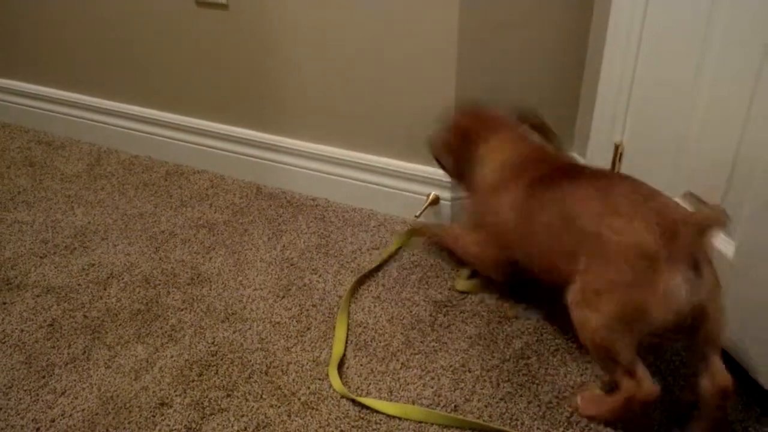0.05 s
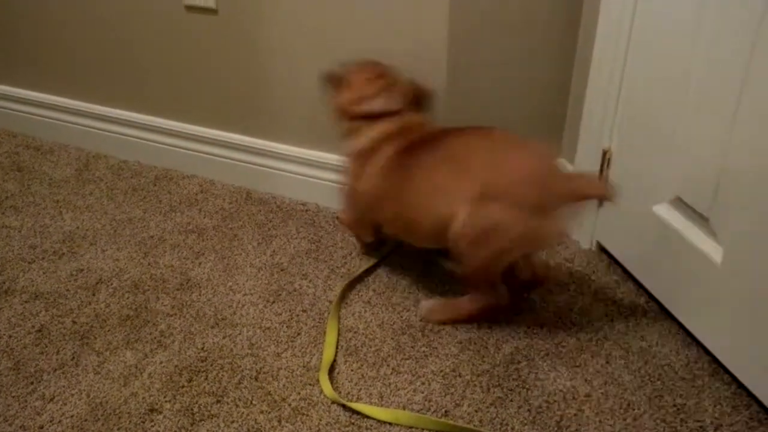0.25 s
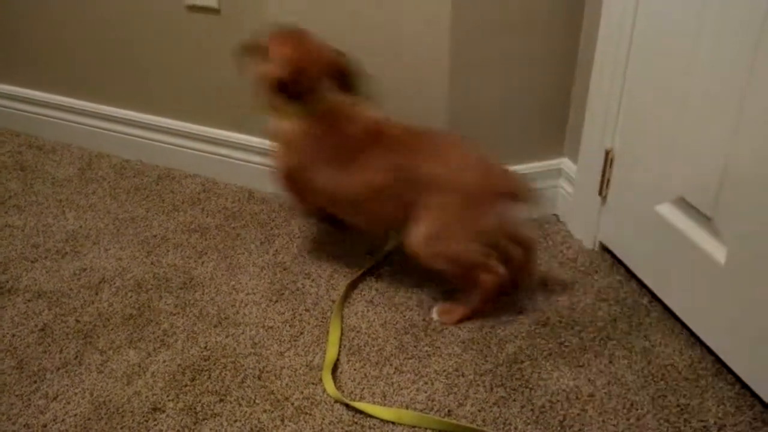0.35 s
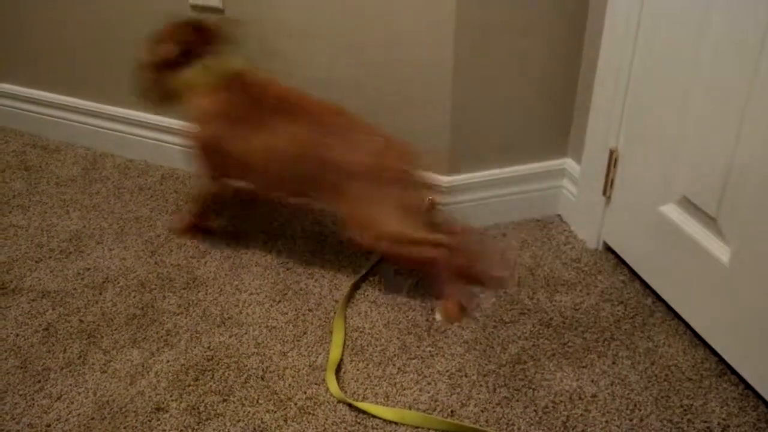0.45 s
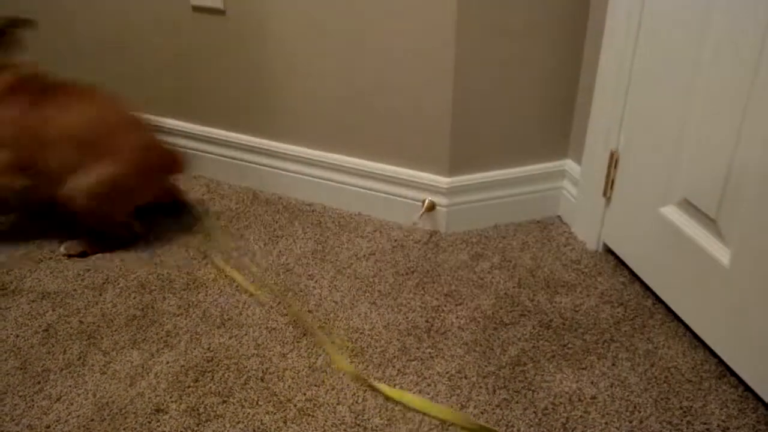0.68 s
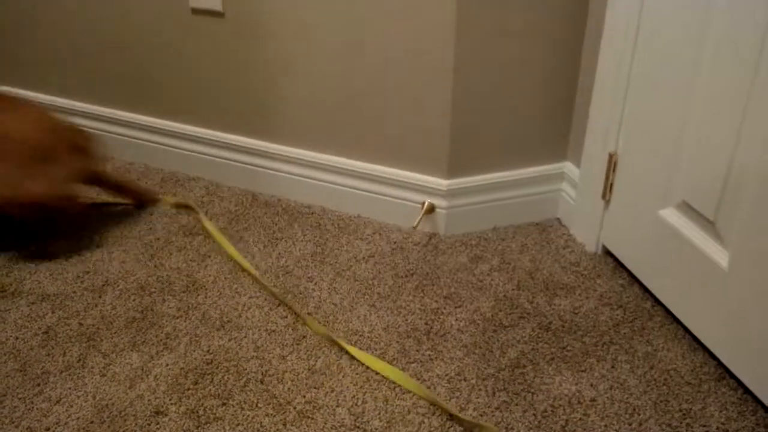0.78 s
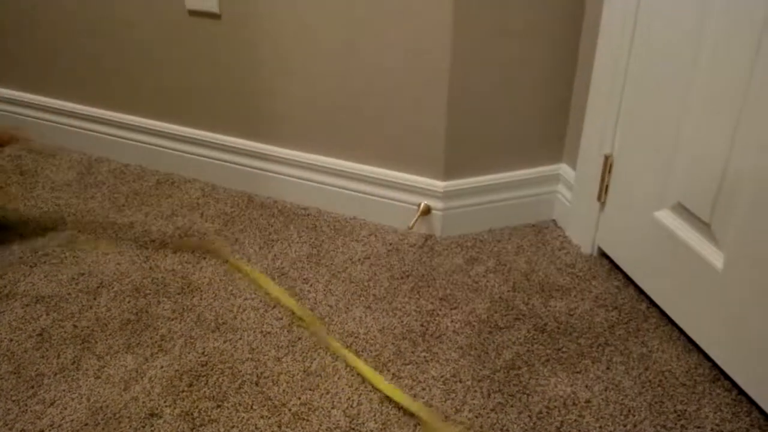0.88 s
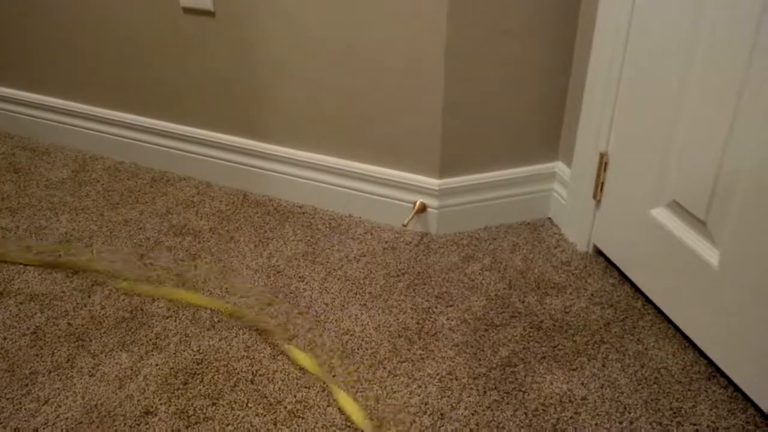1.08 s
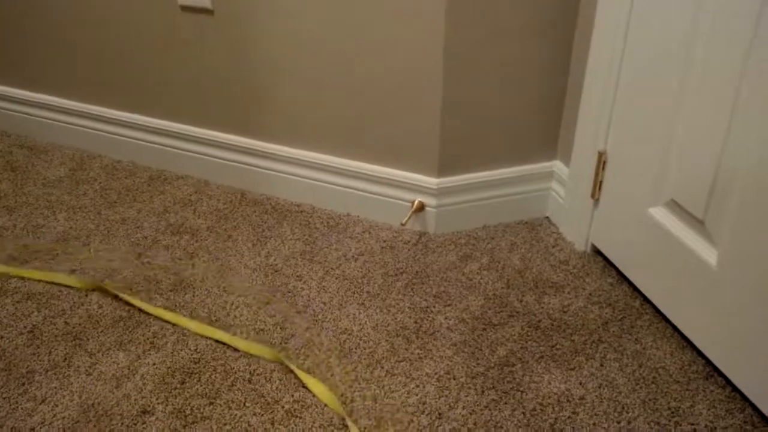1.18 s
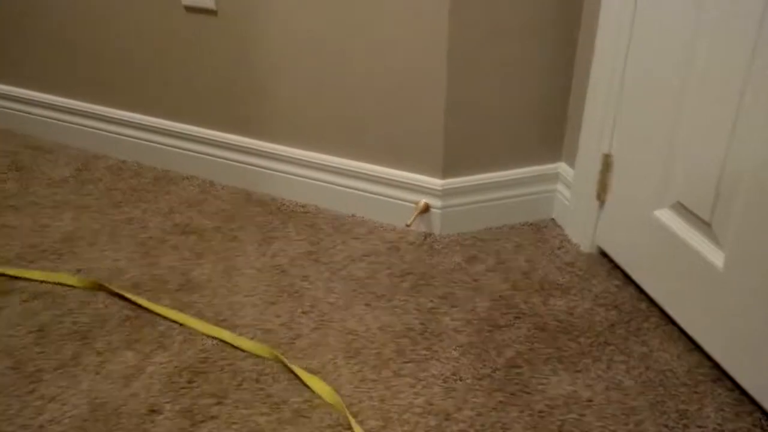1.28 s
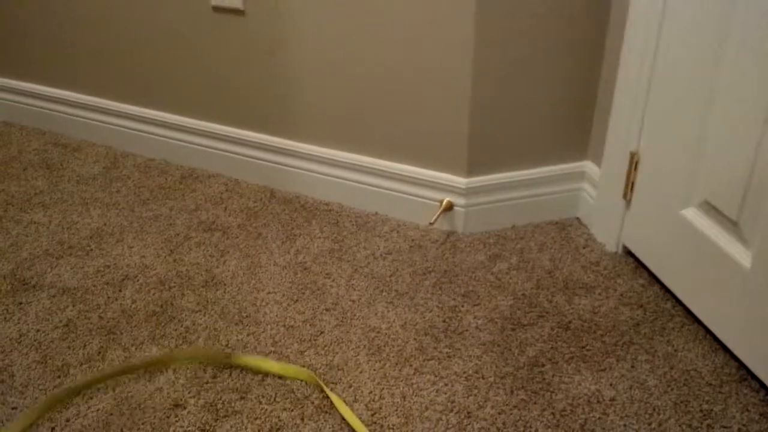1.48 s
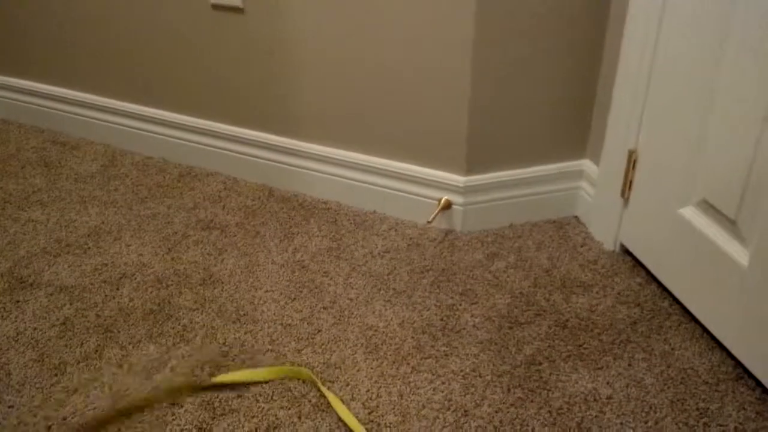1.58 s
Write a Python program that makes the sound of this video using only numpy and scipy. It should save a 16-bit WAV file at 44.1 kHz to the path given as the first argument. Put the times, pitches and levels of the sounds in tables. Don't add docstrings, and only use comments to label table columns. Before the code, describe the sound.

Flicked metal door stop spring buzzes loudly and dies within a second, with paw scuffs on carpet

```python
import sys
import numpy as np
from scipy import signal
from scipy.fft import rfft, irfft, next_fast_len
from scipy.io import wavfile
from scipy.ndimage import uniform_filter1d, map_coordinates

SR = 44100
rng = np.random.default_rng(int(sys.argv[2]) if len(sys.argv) > 2 else 0)


def wrap_up_sound(samples):
    columns = np.atleast_2d(samples).T
    tamed = np.clip(columns, -1, 1)
    steps = np.round(tamed * 32767).astype(np.int16)
    wavfile.write(sys.argv[1], SR, steps)


def invert_db(level):
    return 10 ** (np.asarray(level, dtype=float) / 20)


N = 72765
TIME = np.arange(N) / SR
DECAY_TIME = np.arange(SR // 3) / SR


def unit(x):
    return x / np.sqrt(np.mean(x ** 2) + 1e-20)


def along(points, hz):
    f, v = np.transpose(points)
    return np.interp(np.log(hz + 1), np.log(f + 1), v)


def curve(rows, order=1):
    columns = np.transpose(rows)
    return np.interp(TIME, columns[0], columns[order])


def wobble(rate):
    knots = rng.standard_normal(int(N * rate / SR) + 4)
    return map_coordinates(knots, [np.arange(N) * rate / SR])


def filtered(x, response):
    m = next_fast_len(N + SR // 2)
    return irfft(rfft(x, m) * response(np.fft.rfftfreq(m, 1 / SR)), m)[..., :N]


def rush(spectrum):
    # frequency in Hz, left-right correlation
    likeness = [(60, 0.92), (600, 0.91), (1500, 0.21), (4000, 0.077)]

    def mid_and_side(hz):
        angle = np.arccos(np.clip(along(likeness, hz), -1, 1)) / 2
        return invert_db(along(spectrum, hz)) * [np.cos(angle), np.sin(angle)]

    mid, side = filtered(rng.standard_normal((2, N)), mid_and_side)
    return unit(np.array([mid + side, mid - side]))


def add(track, s, sound):
    part = track[round(s * SR):][:len(sound)]
    part += sound[:len(part)]


def ring(modes, late_s=0):
    scatter_db, detune, snap_s = 2, .003, .005
    hz, db, t60 = np.transpose(modes)[..., None]
    level_luck, pitch_luck = rng.standard_normal((2, len(modes), 1))
    t = np.maximum(DECAY_TIME - late_s, 0)
    decay = invert_db(db + scatter_db * level_luck - 60 * t / t60)
    tones = decay * np.sin(2 * np.pi * hz * (1 + detune * pitch_luck) * t)
    return tones.sum(0) * (1 - np.exp(-t / 0.0013)) * (0.86 + 0.82 * np.exp(-t / snap_s))


def bursts(rows):
    rise_s = 0.0074
    env = np.zeros(N)
    for s, db, t60 in rows:
        decay = invert_db(db - 60 * DECAY_TIME / max(t60, .01))
        add(env, s, decay * (1 - np.exp(-DECAY_TIME / rise_s)))
    return env


def air():
    # frequency in Hz, level in dB
    air_spectrum = [(50, -4), (100, -1.5), (450, -9), (900, -14), (2520, -23), (2700, -8), (2880, -24),
                    (6000, -30), (7500, -65)]
    return invert_db(-43.5 + 0.54 * wobble(3.39)) * rush(air_spectrum)


def hand_rumble():
    # time in seconds, rumble level in dB
    rumble = [
        (0, -43),
        (.5, -53),
        (.7, -37),
        (.82, -47),
        (1.0, -39),
        (1.35, -40.5),
        (1.65, -54.5),
    ]
    centre_hz, width_hz = 25.5, 1.4
    hand = filtered(rng.standard_normal(N), lambda hz: np.exp(-((hz - centre_hz) / width_hz) ** 2))
    power = uniform_filter1d(hand ** 2, size=5000)
    hand = hand / np.sqrt(power + 0.013 * np.mean(hand ** 2))
    return invert_db(curve(rumble)) * hand * invert_db([[-.6], [.6]])


def rustle():
    # time in seconds, rustle level in dB, level of its treble in dB
    motion = [(0, -49.5, -9), (.13, -52, -7), (.17, -47.5, 14), (.4, -30.5, -2.5), (.8, -38, -2.5),
              (1.1, -53, 6), (1.15, -57, 1), (1.22, -70, 1), (1.25, -50, -1.5), (1.32, -59, 0),
              (1.38, -53.5, -4), (1.47, -49, -7), (1.52, -51.5, -12), (1.65, -58, -12)]
    # frequency in Hz, level in dB per Hz
    pile_spectrum = [(100, -20), (280, 9), (1000, 4.5), (3000, -2), (8000, -16), (12500, -22.5),
                     (16000, -39)]
    # frequency in Hz, level in dB per Hz
    swish_spectrum = [(1500, -22), (4000, 3), (7800, -2), (12500, -12.5), (14000, -46)]
    treble_hz, rustle_db = 6600, 9
    swish_s, swish_width_s, swish_db = 1.318, .036, -41
    swell = np.exp(-((TIME - swish_s) / swish_width_s) ** 2)
    swish = invert_db(swish_db) * swell * rush(swish_spectrum)
    grain = invert_db(2.95 * wobble(25.38) + wobble(400))
    pile = unit(grain * rush(pile_spectrum))
    dull = filtered(pile, lambda hz: 1 / (1 + (hz / treble_hz) ** 6))
    brushed = dull + invert_db(curve(motion, order=2)) * (pile - dull)
    return invert_db(curve(motion) + rustle_db) * brushed + swish


def paws():
    # start in seconds, peak in dB, pitch in Hz, puff over thump in dB
    steps = [(0.096, -35.5, 337, -2), (0.175, -18.5, 280, 3), (0.199, -28, 180, -8),
             (0.458, -23.5, 179, -7.5), (0.854, -38, 310, -10), (1.032, -23.5, 324, 1.5),
             (1.045, -23.5, 342, 0), (1.053, -21, 343, 1.5), (1.064, -34.5, 337, -6),
             (1.076, -27.5, 472, -5.5), (1.09, -32, 657, -13), (1.102, -35, 614, 4), (1.166, -33, 357, 6.5),
             (1.178, -35, 725, -4), (1.258, -42, 269, -4), (1.294, -22, 337, -2.5), (1.336, -28, 332, 1.5),
             (1.356, -35.5, 310, -15), (1.377, -42, 430, -18), (1.389, -35, 285, -13), (1.4, -31, 308, -3),
             (1.434, -29.5, 485, -10), (1.452, -25.5, 310.6, -4.5), (1.464, -31, 325, -13),
             (1.481, -35, 347, -11.5), (1.616, -40.5, 330, 9.5)]
    # frequency in Hz, level in dB
    puff_spectrum = [(120, -12), (340, -8), (600, 0), (850, 4), (1200, -2), (2500, -8), (6000, -28),
                     (12000, -86)]
    t60, puff_t60, thump_level, puff_level = .095, .075, -5, -4
    onset = 1 - np.exp(-DECAY_TIME / 0.00067)
    thumps = np.zeros(N)
    for s, db, hz, puff_db in steps:
        modes = [(hz, 0, t60), (hz * 1.3, -9, t60), (hz * 2.31, -17, t60 / 2)]
        add(thumps, s, invert_db(db + thump_level - puff_db) * onset * ring(modes))
    puffs = bursts([(s, db + puff_level + puff_db, puff_t60) for s, db, _, puff_db in steps])
    return thumps + puffs * rush(puff_spectrum)[0]


def scuffs():
    # start in seconds, peak in dB, brightness in dB
    scratches = [(0.159, -22.5, -3), (0.186, -37.5, -11), (0.217, -23, -5.5), (0.2625, -11.5, -7),
                 (0.3386, -20, -3), (0.4522, -17, -3.5), (0.496, -19.5, -4.5), (0.569, -22, -4),
                 (0.617, -26.5, -2), (0.666, -26, -1), (0.6993, -34, 6), (0.726, -45, 8), (0.769, -22, -2),
                 (0.8994, -34.5, -2), (0.999, -33.5, -5), (1.024, -44, -10), (1.0585, -44, 9),
                 (1.108, -37.5, 1.5), (1.118, -49, -6), (1.165, -46, -13.5), (1.227, -56, 0)]
    level, t60 = -5, .1
    dull = bursts([(s, db + level - bright, t60) for s, db, bright in scratches])
    sharp = bursts([(s, db + level + bright, t60) for s, db, bright in scratches])
    dull = dull * rush([(1500, -4), (3500, -1.5), (7000, -11.5), (16000, -23.5)])
    sharp = sharp * rush([(4000, -74), (8000, -0.5), (11000, 0), (16000, -11.0)])
    return (dull + sharp) * invert_db(3.4 * wobble(300))


def board_hum():
    # time in seconds, hum level in dB, pitch in Hz
    hum = [(.14, -86, 287.3), (.176, -29, 288.5), (.274, -33.5, 264.7), (.3, -23.5, 268.7),
           (.356, -20, 260.2), (.406, -19.5, 267.2), (.436, -52, 275.6), (.455, -27, 272.3),
           (.465, -20, 270.6), (.482, -17.5, 269.5), (.495, -32, 276.5), (.512, -22, 259.1),
           (.615, -29.5, 264), (.632, -38, 279), (.654, -24, 272.6), (.75, -51, 262.5), (.79, -35, 259.3),
           (.95, -56, 261.3)]
    drift, flutter_db = .025, 3.5
    hz = curve(hum, order=2) * (1 + drift * wobble(30.45))
    tone = np.sin(2 * np.pi * np.cumsum(hz) / SR)
    return tone * invert_db(curve(hum) + 2.0 + flutter_db * wobble(43.84))


def pings():
    # start in seconds, peak in dB, pitch in Hz
    ticks = [(0.187, -22, 5450), (0.195, -28.5, 5340), (0.642, -35, 10900), (0.772, -27.5, 13700),
             (.922, -31, 1840), (1.025, -35, 2440), (1.031, -32, 2450), (1.042, -44, 2460),
             (1.051, -38, 2400), (1.052, -33, 3530), (1.059, -39, 11200), (1.066, -40, 10960),
             (1.076, -45, 11050), (1.111, -38, 15200), (1.119, -41, 15300), (1.228, -52, 15500),
             (1.2471, -46, 2680), (1.294, -42, 1640), (1.296, -39, 5240), (1.311, -35.5, 3140),
             (1.404, -37, 2630), (1.441, -38.5, 2800), (1.457, -34, 1666), (1.467, -32.5, 1156)]
    level, t60 = -3, .03
    out = np.zeros(N)
    for s, db, hz in ticks:
        modes = [(hz, 0, t60), (hz * 0.96, -3, t60 / 2), (hz / 1.02, -3, t60 / 2)]
        add(out, s, invert_db(db + level) * ring(modes))
    return out * invert_db([[1.5], [-1.5]])


def coil_singing():
    # time in seconds, level in dB
    sing = [(.14, -100), (.22, -51), (.27, -18.5), (.42, -27), (.44, -28), (.6, -33), (.66, -25),
            (.715, -20), (.745, -34.5), (.79, -30), (.82, -46), (.85, -42), (.94, -45), (.99, -73)]
    pitch_hz, drift = 971, .005
    tone = np.sin(2 * np.pi * np.cumsum(pitch_hz * (1 + drift * wobble(40.2))) / SR)
    return tone * invert_db(curve(sing) + 5.2 * wobble(59.8))


def coil_claps():
    # start in seconds, peak in dB, middle modes in dB, top modes in dB
    claps = [(0.221, -15, -13, -5.5), (0.238, -6, -25, -11), (0.247, -19, -2, -0.5), (0.265, -8, 0, 0.5),
             (0.29, -0.5, -11, -4), (0.314, -19.5, 5, 8.5), (0.338, -2.5, -12, -4.5),
             (0.358, -7.5, -7, -4.5), (0.371, -19.5, 4.5, -0.5), (0.384, -4, -7.5, -3.5),
             (0.406, -8, -4.5, -2), (0.454, -8.5, -13, -14), (0.465, -8.5, -41, -14), (0.497, -7.5, -9, -5),
             (0.52, -6, -9.5, 0.5), (0.542, -8.5, -19, -14), (0.571, -12, -7, -8), (0.592, -9, -8.5, -2),
             (0.624, -15, -15, -7), (0.639, -15, -12, -15), (0.656, -13.5, -13, -12.5),
             (0.696, -17, -13, -7.5), (0.718, -16.5, -10, -2.5), (0.773, -17.5, -12, -5.5),
             (0.784, -11, -29, -16.5), (0.795, -30.5, 0, -25), (0.842, -18, -41, -32),
             (0.869, -27, -31, -14), (0.903, -24.5, -30, -18), (0.928, -18.5, -24, -15)]
    # frequency in Hz, level in dB, t60 in seconds
    coil_low = [(702, -5, .14), (791, -6, .09), (880, -2, .09), (978, 0, .09), (1066, -4, .09),
                (1110, -9, .08), (1240, -11, .05)]
    # frequency in Hz, level in dB, t60 in seconds
    coil_mid = [(1503, -10, .06), (1674, -1, .08), (1807, -6, .07), (1855, -1, .08), (1990, -7, .05),
                (2107, -6, .07)]
    # frequency in Hz, level in dB, t60 in seconds
    coil_high = [(2280, -4, .045), (2360, -1, .05), (2497, 0, .05), (2560, -4, .04), (2645, -3, .055)]
    # frequency in Hz, level in dB, t60 in seconds
    board = [(185, -4, 0.11), (331.4, -3.5, 0.094)]
    low_level, mid_level, high_level, board_level = -7, -1.5, -5, -13
    crack_level, crack_t60, late_s = -3, 0.048, .0025
    out = np.zeros(N)
    for s, db, mid_db, high_db in claps:
        clap = invert_db(low_level) * ring(coil_low) + invert_db(board_level) * ring(board)
        clap += invert_db(mid_level + mid_db) * ring(coil_mid, late_s)
        clap += invert_db(high_level + high_db) * ring(coil_high, late_s)
        add(out, s, invert_db(db) * clap)
    crack = bursts([(s, db + high_db + crack_level, crack_t60) for s, db, _, high_db in claps])
    return out + crack * rush([(1000, -2), (2300, 15), (3400, 5.5), (6000, -6), (16000, -16)])[0]


def spring():
    still_s = 1.0
    return coil_claps() + (board_hum() + coil_singing()) * (TIME < still_s)


def floor_dip(hz, share=1):
    dip_hz, width_hz, depth_db = 583.6, 87, -24
    return invert_db(share * depth_db * np.exp(-((hz - dip_hz) / width_hz) ** 2))


def paw_touch():
    touch_s, width_s, depth_db = .44, 0.012, -5
    return invert_db(depth_db * np.exp(-((TIME - touch_s) / width_s) ** 2))


def room(x, count=24):
    # frequency in Hz, t60 in seconds
    decay = [(200, 0.23), (2000, 0.13), (10000, 0.18)]
    # frequency in Hz, reverberant level in dB
    wet = [(200, -30), (700, -6), (1500, 1), (4000, 9.5), (12000, 10)]
    out = np.zeros((2, N))
    place = np.arange(N) * count / N
    for k in range(count + 1):
        hz, t, z = signal.stft(rng.standard_normal((2, SR // 3)), SR, nperseg=256)
        t60 = along(decay, hz)[:, None]
        level = invert_db(along(wet, hz)[:, None] - 60 * t / t60) / np.sqrt(t60 * SR / 14)
        tail = signal.istft(z * level, SR, nperseg=256)[1]
        part = x * np.clip(1 - np.abs(place - k), 0, 1)
        out += signal.fftconvolve(part[None], tail, axes=1)[:, :N]
    return out


def scene():
    low_cut_hz, across = 83, 0.3
    near = filtered(spring() + paws(), lambda hz: floor_dip(hz) / (1 + (low_cut_hz / (hz + 1)) ** 4))
    walls = room(near)
    walls = walls - across * walls.mean(0)
    carpet = filtered(rustle(), lambda hz: floor_dip(hz, 0.28))
    dog_and_spring = near * invert_db([[.4], [-.4]]) + walls + scuffs() + pings() + carpet
    return paw_touch() * dog_and_spring + air() + hand_rumble()


def top_cut(x):
    return signal.sosfilt(signal.butter(12, 16170, fs=SR, output="sos"), x)


def record(dry):
    wake_s, wake_db, wake_hz = .13, -7, 3220
    ceiling, knee, top_hz = 1.1, 4, 16030
    asleep = np.clip(1 - TIME / wake_s, 0, 1)
    dull = filtered(dry, lambda hz: 1 / (1 + (hz / wake_hz) ** 6))
    x = invert_db(wake_db * asleep) * (dull + (1 - asleep) ** 2 * (dry - dull))
    limited = x / (1 + np.abs(x / ceiling) ** knee) ** (1 / knee)
    mix = filtered(limited, lambda hz: np.clip((top_hz - hz) / 300, 0, 1))
    return top_cut(mix)


dry = scene()
out = record(dry)
wrap_up_sound(out)
```